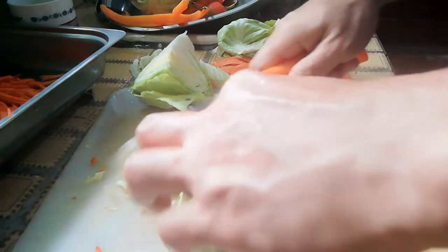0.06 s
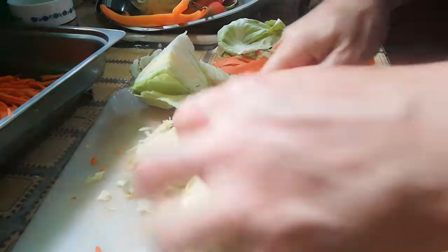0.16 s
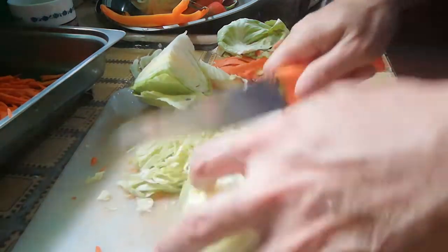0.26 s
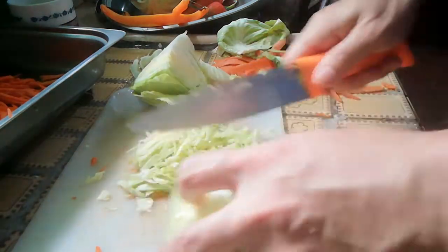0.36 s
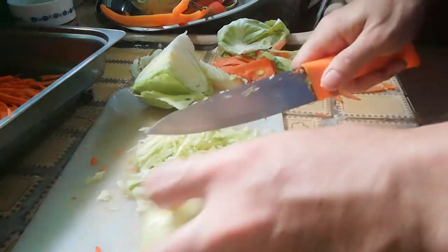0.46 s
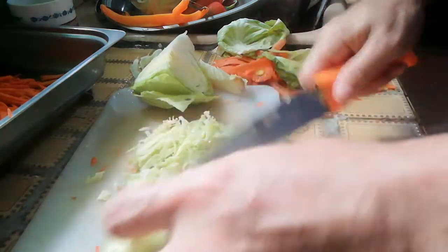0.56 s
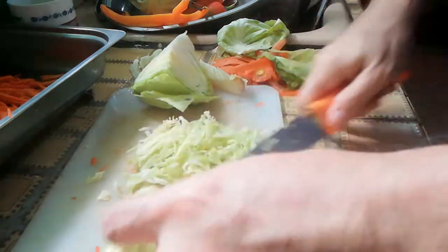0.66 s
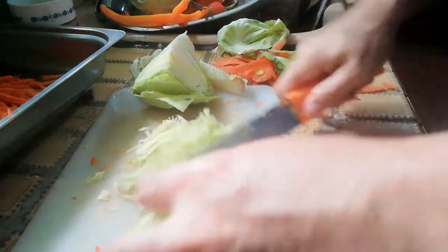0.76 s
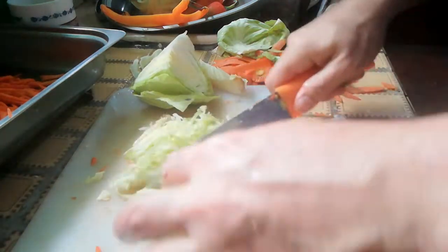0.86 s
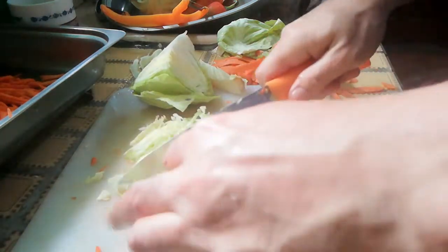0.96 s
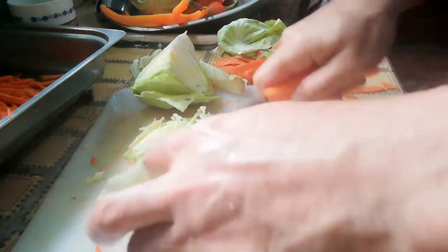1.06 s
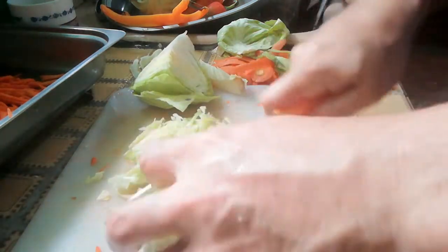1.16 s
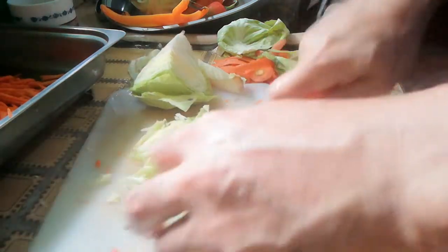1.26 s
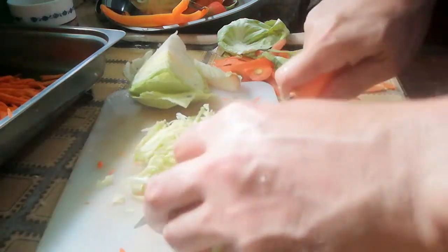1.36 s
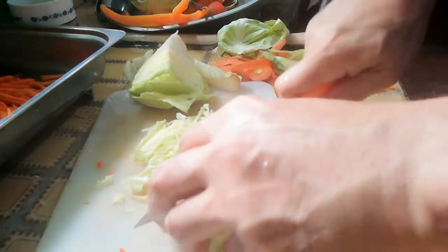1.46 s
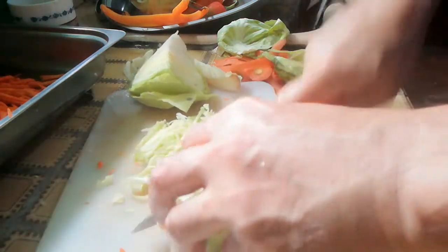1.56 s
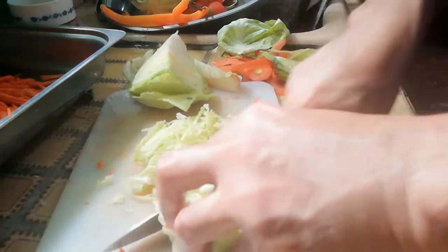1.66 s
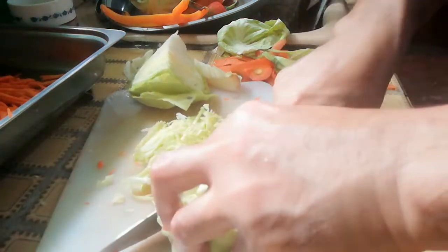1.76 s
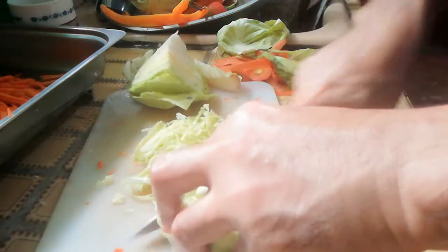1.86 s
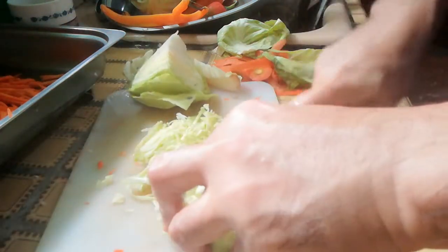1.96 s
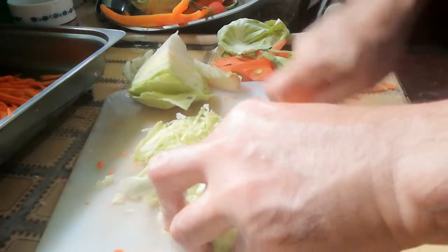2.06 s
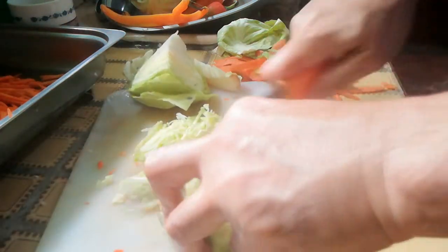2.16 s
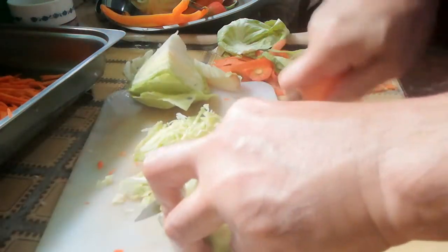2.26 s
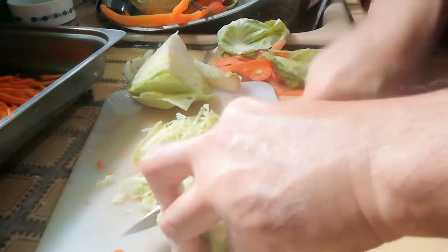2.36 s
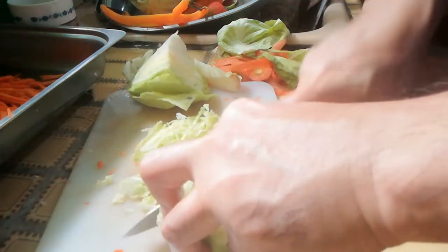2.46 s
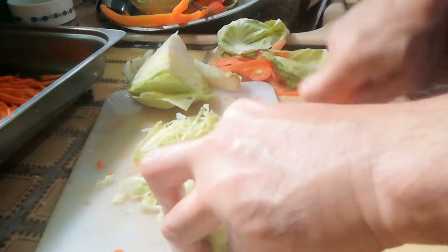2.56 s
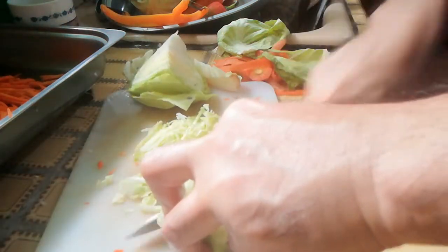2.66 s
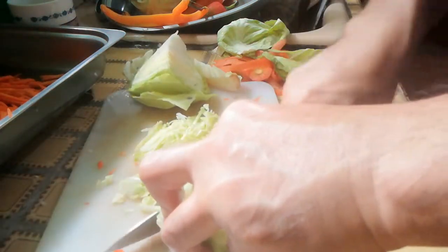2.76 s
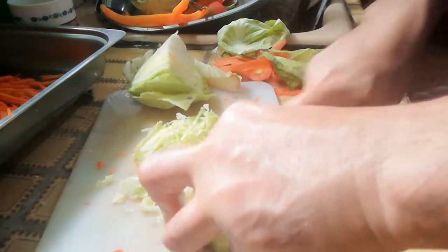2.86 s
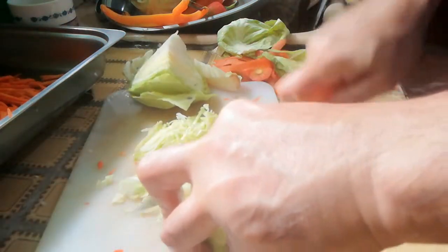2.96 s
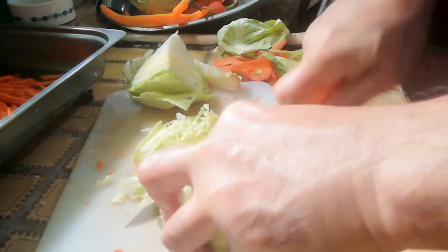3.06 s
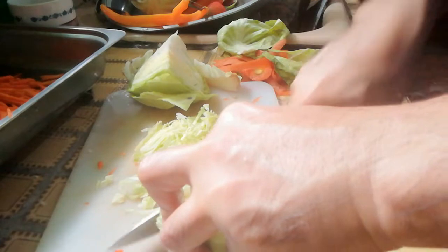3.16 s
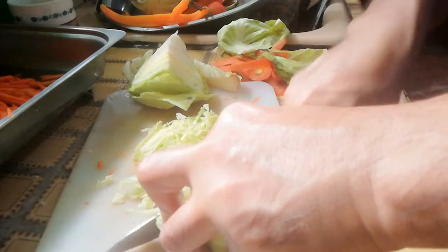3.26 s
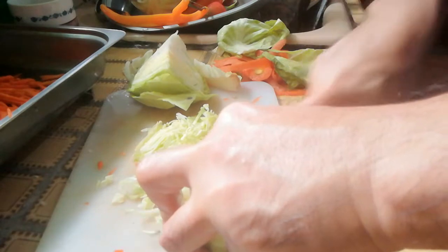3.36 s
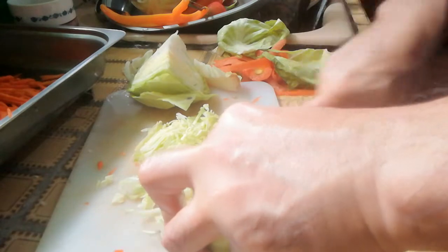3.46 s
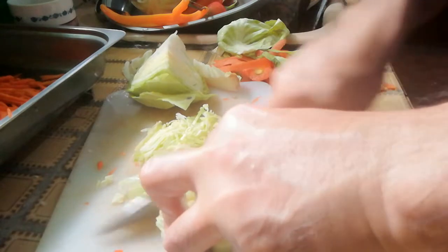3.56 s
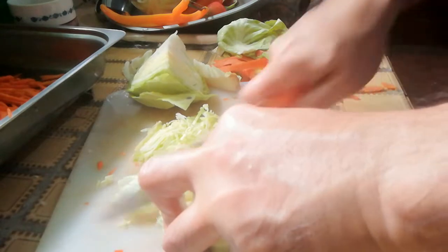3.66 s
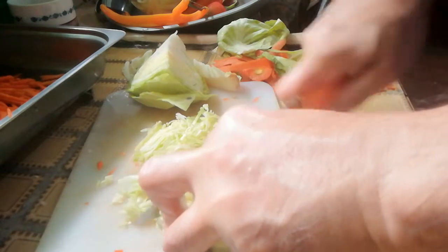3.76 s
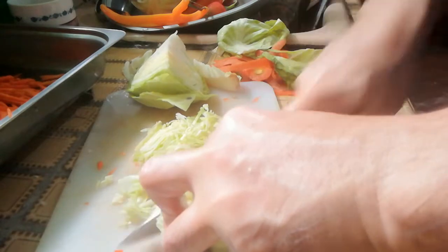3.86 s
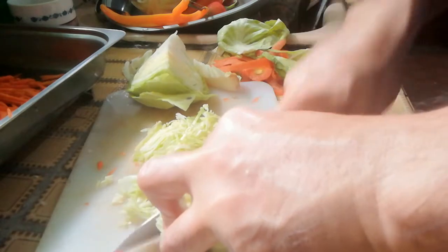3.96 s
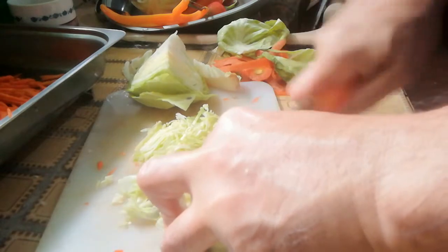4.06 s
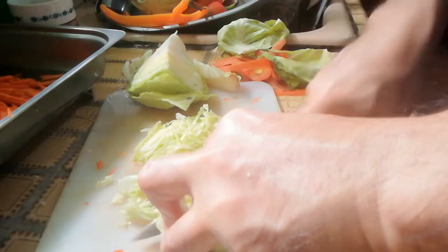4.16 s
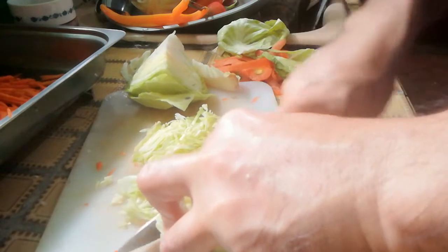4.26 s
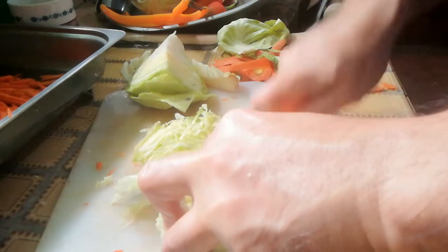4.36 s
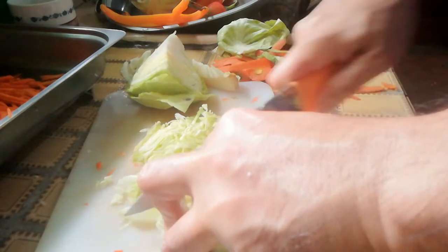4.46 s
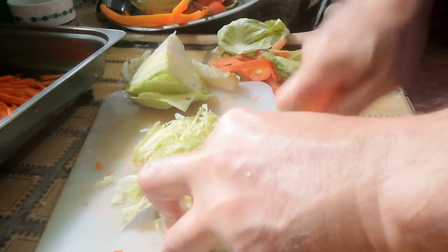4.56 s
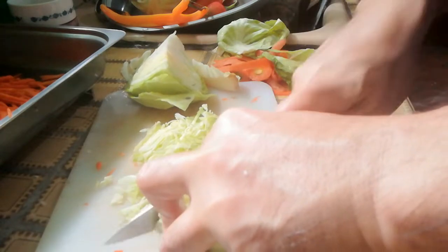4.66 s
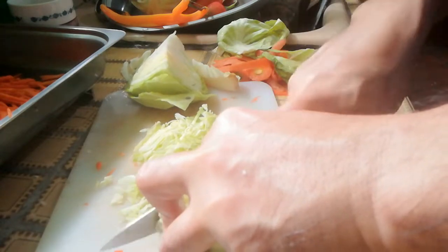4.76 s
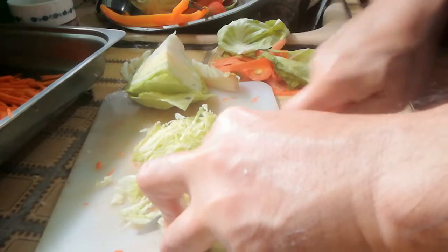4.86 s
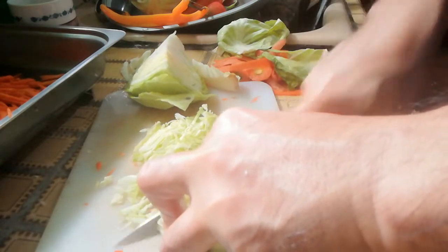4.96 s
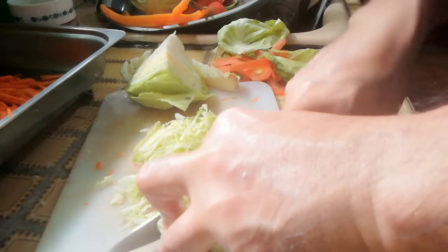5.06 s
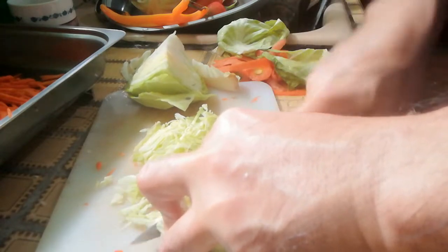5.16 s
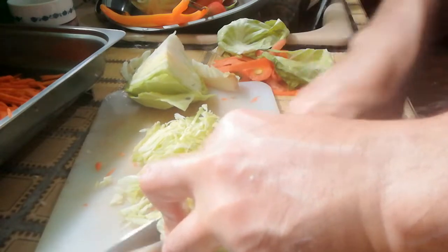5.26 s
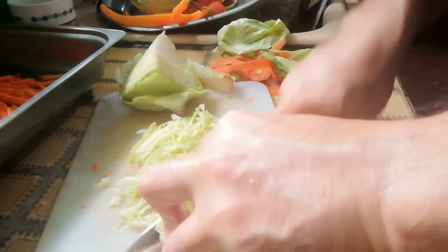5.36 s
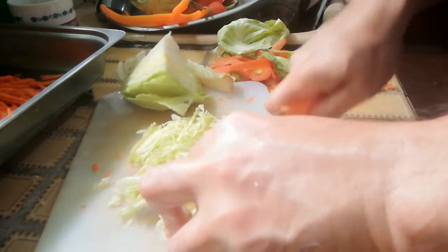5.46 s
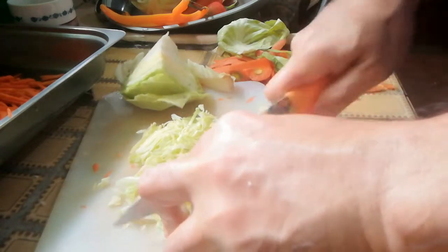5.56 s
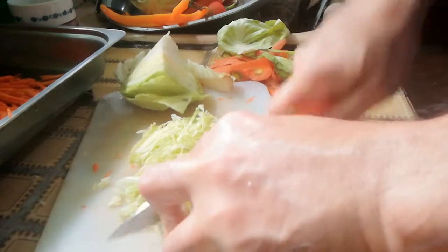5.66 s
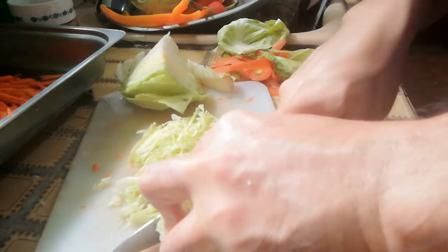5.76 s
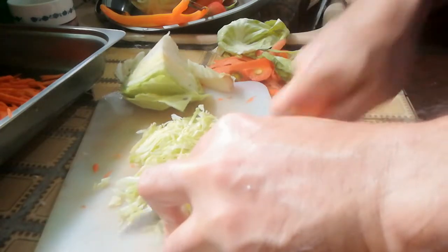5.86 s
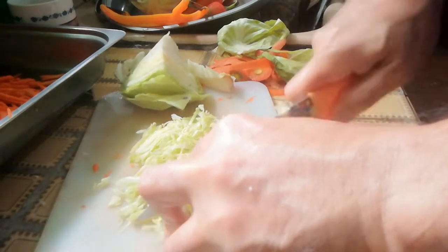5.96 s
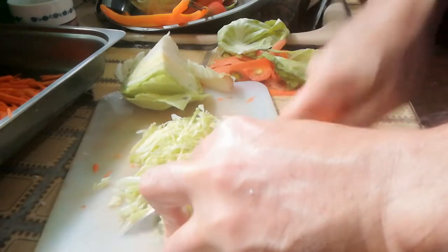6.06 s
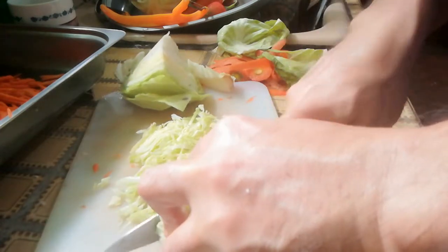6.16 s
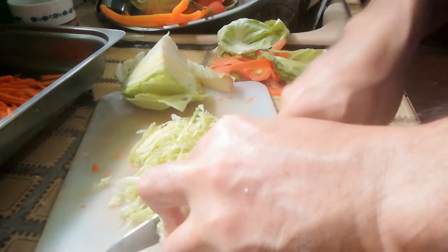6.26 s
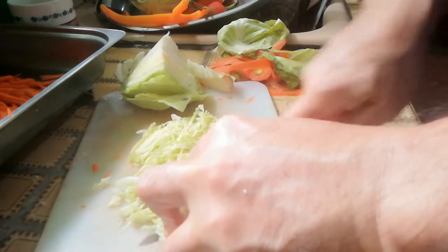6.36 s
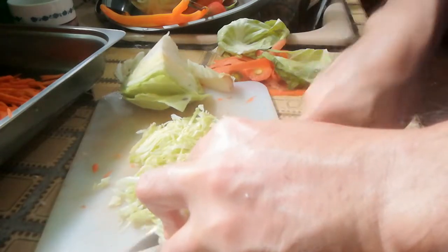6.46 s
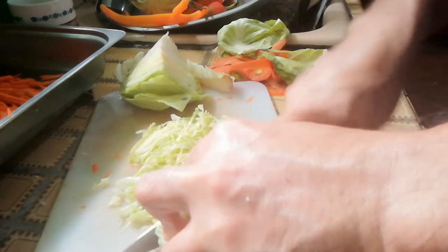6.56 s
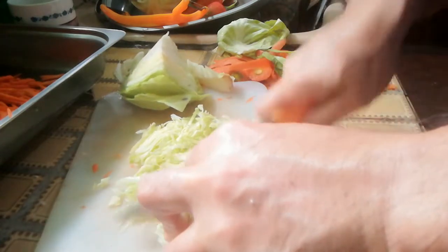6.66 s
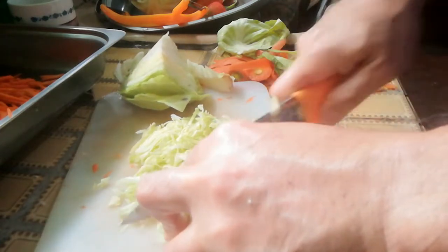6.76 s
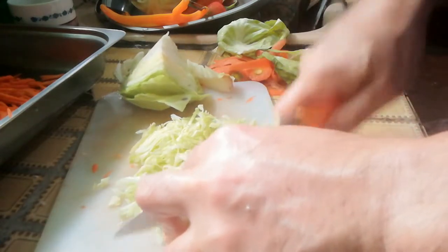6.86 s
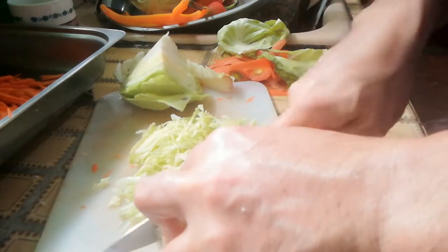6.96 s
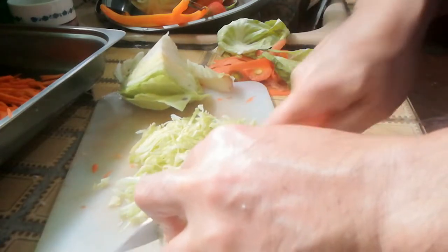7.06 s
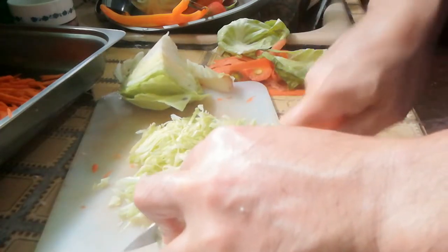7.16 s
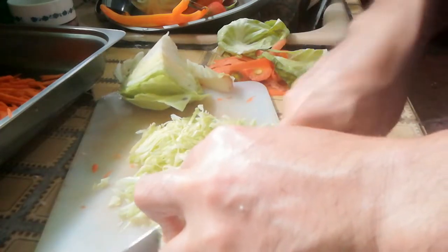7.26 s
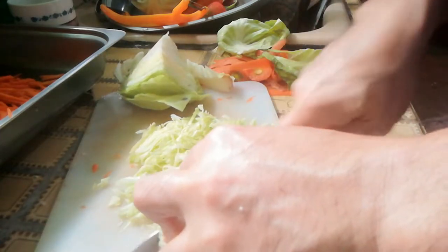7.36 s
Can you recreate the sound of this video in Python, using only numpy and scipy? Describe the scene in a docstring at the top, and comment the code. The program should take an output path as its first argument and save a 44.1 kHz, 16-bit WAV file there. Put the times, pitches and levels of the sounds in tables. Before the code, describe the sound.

Cabbage being shredded by hand, heard very near, with a short room reflection. Light leaf rustling and bright snaps come first, then a steady but uneven run of crunching cuts, from airy crackle to deeper crush. The blade edge scrapes and occasionally taps the board, the strongest tap late on, and a few heavy strokes thud dully into the table. Quiet mains hum and room air continue throughout.

```python
"""Over a mains hum and the soft rush of a small kitchen, a hand gathers cabbage leaves, rustling and snapping ribs.
Then a knife shreds the wedge close by: each cut grazes, bites deeper and leaves shreds to settle.
The crunch is layered from runs of bursting cells: crisp crackle, fine fizz and a deep crush.
From the first cut on, the edge rasps and ticks on the plastic board, and some strokes thud into the table.
Once, a faint low tone sags as the knife is drawn back."""
import sys
import numpy as np
from scipy import signal
from scipy.fft import rfft, irfft, next_fast_len
from scipy.io import wavfile
from scipy.ndimage import map_coordinates

SR = 44100
rng = np.random.default_rng(int(sys.argv[2]) if len(sys.argv) > 2 else 0)


def unload_wav(signal):
    """Save mono or channel-first audio to the path in sys.argv[1] as 16-bit WAV at rate SR, clipped to [-1, 1]."""
    wavfile.write(
        sys.argv[1],
        SR,
        np.round(np.clip(np.atleast_2d(signal).T, -1, 1) * 32767).astype(np.int16),
    )


N = 326781

# Event levels are those of the dry sounds, before panning and room.
# Rush of the quiet kitchen, relative spectrum: (frequency [Hz], level [dB])
AIR_SPECTRUM = [(20, -14), (45, -17), (80, -11.5), (105, -11.5), (150, -14), (235, -13), (320, -20.5),
                (450, -18), (700, -18), (1100, -21), (1600, -27), (3500, -29), (7500, -32), (11000, -44),
                (16000, -49)]
# Mains hum partials: (frequency [Hz], rms level [dB])
HUM_PARTIALS = [(59.9, -76), (119.85, -67)]
# Likeness of diffuse sound at the two spaced ports: (frequency [Hz], left-right correlation [-1 to 1])
PORT_LIKENESS = [(100, 0.97), (170, 0.94), (270, 0.86), (450, -0.42), (700, -0.87), (950, 0.11),
                 (1250, 0.1), (2000, 0.29), (3300, -0.056), (8000, -0.085)]
# Fingers and the flat of the blade push the leaves about:
# (time [s], length [s], crisp level [dB], weight of crush over crisp [dB])
RUSTLES = [(.005, 0.2, -75.5, -3), (0.323, 0.075, -55.5, -6.5), (0.595, 0.11, -60.5, -4.5),
           (0.697, 0.16, -56.5, -6), (0.948, .13, -61.5, -5), (1.114, 0.18, -54.5, -3),
           (1.312, 0.11, -53.5, -5), (1.478, 0.072, -46.5, -4), (1.728, 0.18, -53.5, -2),
           (2.06, 0.023, -47, -14), (2.16, 0.11, -59.5, -11), (2.49, .035, -55, -4.5),
           (2.588, 0.021, -49.5, 4.5), (2.8, 0.048, -55, 0.5), (3.28, 0.1, -48.5, -3.5),
           (3.995, 0.015, -50.5, -2), (4.305, .015, -55.5, 7), (4.805, 0.016, -50.5, -7),
           (5.338, 0.016, -46, -11), (5.823, 0.079, -63.5, 9.5), (6.536, 0.069, -54.5, -1),
           (7.34, 0.054, -56.5, -12.5)]
# The knife goes through the wedge:
# (time [s], length [s], crisp level [dB], weight of crush over crisp [dB], graze beforehand [s])
CUTS = [(1.568, 0.073, -37, -1, 0.035), (2.027, 0.0077, -38, -2.5, 0), (2.326, 0.058, -39, -1.5, 0.053),
        (2.635, 0.021, -36.5, -7, 0.055), (3.105, 0.09, -36.5, -3.5, 0.054),
        (3.532, 0.026, -41, 6.5, 0.064), (3.815, 0.066, -37.5, -3, 0.052), (4.092, 0.021, -36, 0, 0.042),
        (4.325, 0.017, -39.5, 2.5, 0.049), (4.592, 0.15, -42, -5.5, 0.071), (4.951, 0.069, -40.5, -3, 0),
        (5.202, 0.025, -36.5, -1.5, 0.062), (5.41, 0.019, -38.5, 2, 0.086), (5.683, 0.083, -40, -4, 0.043),
        (6.07, 0.13, -39.5, -4.5, 0.043), (6.427, 0.041, -38.5, -2.5, 0.0064),
        (6.605, 0.019, -43.5, 3, 0.026), (6.87, 0.09, -39.5, -3, 0.044), (7.179, 0.084, -40, -5.5, 0.0081)]
# Leaf skin cracking, relative spectrum: (frequency [Hz], level [dB])
CRISP_SPECTRUM = [(1500, -32), (3200, -9.5), (4300, -4.5), (5600, -4.5), (7400, 1.5), (8600, -4.5),
                  (10000, -14.5), (12500, -91), (16000, -25)]
# The finest fizz of the skin, relative spectrum: (frequency [Hz], level [dB])
FIZZ_SPECTRUM = [(7000, -1), (10000, 5), (12000, 1), (15800, -4)]
# Packed leaves being crushed, relative spectrum: (frequency [Hz], level [dB])
CRUSH_SPECTRUM = [(60, -54), (160, -18.5), (330, -21), (600, -16.5), (780, -12.5), (1080, -3.5),
                  (1800, -4.5), (2500, -6), (3300, -1.5), (4500, -3.5), (7000, -9), (12000, -32.5)]
# Single ribs and shreds snap: (time [s], peak level before a 3 dB lift [dB], pitch [Hz])
RIB_SNAPS = [(0.603, -32.5, 4440), (0.7592, -39.5, 6740), (1.112, -35, 7400), (1.3217, -34.5, 7260),
             (1.3968, -30.5, 7780), (1.482, -32, 7500), (1.4892, -30, 3300), (1.702, -29.5, 9100),
             (1.7947, -30.5, 6230), (1.8703, -33, 7500), (2.1907, -35, 7500), (2.3101, -27, 4400),
             (3.0224, -43, 7940), (3.0725, -31.5, 7600), (3.0904, -29, 7500), (3.1945, -26, 9000),
             (3.7025, -35, 8600), (4.0846, -29.5, 7600), (4.243, -35, 7550), (4.4842, -30.5, 6900),
             (4.528, -39.5, 7950), (4.57, -32, 7680), (4.6051, -26, 7700), (5.3427, -28, 7250),
             (6.009, -40, 4550), (6.2246, -28.5, 7740), (6.7642, -41.5, 4500), (7.2541, -24, 8140)]
# The edge bites and skids over the board: (time [s], length [s], level [dB], pitch [Hz])
BOARD_SCRAPES = [(1.588, 0.048, -44, 1060), (2.013, 0.026, -42, 2160), (2.635, 0.037, -40.5, 1450),
                 (3.181, 0.026, -41, 1190), (3.529, 0.026, -34.5, 2830), (4.09, 0.019, -49, 4240),
                 (4.311, 0.034, -39, 3250), (5.203, 0.035, -51, 7570), (5.41, 0.022, -32, 3100),
                 (6.139, 0.05, -45, 1350), (6.418, 0.016, -41.5, 6800), (6.614, 0.025, -37, 2470),
                 (7.112, 0.027, -54, 1410)]
# The table under a heavy stroke: (time [s], starting level [dB], pitch [Hz])
TABLE_THUDS = [(1.614, -55, 189), (2.331, -54, 200), (4.099, -50.5, 192), (5.754, -53, 45.5)]
# The edge breaks through and lands: (time [s], level [dB], hardness [dB], ring [Hz])
BOARD_TAPS = [(1.636, -32.5, -4, 1500), (2.6545, -30, -8, 1700), (4.1065, -25, -14, 1780),
              (5.2222, -28.5, -10, 1820), (5.7655, -20.5, -1, 1920), (6.4698, -31, -10, 1860),
              (7.257, -33, 2, 1550)]
# Modes of blade on board before choking: (multiple of the ring [ratio], level [dB], t60 [s])
BOARD_MODES = [(.64, 1, .012), (1, 13.5, .018), (1.24, 12.5, .008), (1.6, 11.5, 0.015), (2.45, -4, .006),
               (4.05, 13, .008)]
# Decay of the room: (frequency [Hz], t60 [s])
KITCHEN_DECAY = [(300, 0.57), (1000, 0.34), (2700, 0.33), (4500, 0.25), (8000, 0.28), (14000, 0.29)]

HOLD_DB = -77  # the wedge creaks faintly under the hand that holds it
RUSTLE_RISE_S, RUSTLE_FALL_S = 0.011, 0.02
# A cut builds up as the edge sinks in (a longer one more gently) and stops once it is through
BITE_S, BITE_SHARE, THROUGH_S = 0.0068, 0.093, 0.0071
DEEPEN_DB = 2.5  # gain in weight over one cut, from crisp outer leaves to packed core
# The graze before a cut and the shreds settling after it: level and weight against the cut
GRAZE_DB, GRAZE_WEIGHT_DB = -14.5, -7
SETTLE_DB, SETTLE_WEIGHT_DB = -10, -1.5
SETTLE_S, SETTLE_SHARE = 0.029, .55  # a longer cut leaves more shreds, which settle longer
# Small shreds snapping in a rustle: rate, peak over the rustle before the snaps' lift, centre pitch
STRAYS_PER_S, STRAY_DB, STRAY_HZ = 14, 14, 7340
TOP_HZ = 15850  # band limit of the recorder


def amp(db):
    """Decibels to gain."""
    return 10 ** (np.asarray(db) / 20)


def unit(x):
    """Scale to rms 1."""
    return x / np.sqrt(np.mean(x ** 2) + 1e-20)


def along(points, hz):
    """Read (frequency, value) points on a log frequency axis."""
    f, v = np.transpose(points)
    return np.interp(np.log(hz + 1), np.log(f + 1), v)


def clock(count):
    """Seconds of count samples."""
    return np.arange(count) / SR


def filtered(x, response):
    """Apply a response of frequency to x, padded so that its tail does not wrap at once."""
    n = x.shape[-1]
    m = next_fast_len(n + min(n, SR // 4))
    hz = np.fft.rfftfreq(m, 1 / SR)
    return irfft(rfft(x, m) * response(hz), m)[..., :n]


def coloured(x, spectrum):
    """Shape x by (frequency, dB) points."""
    return filtered(x, lambda hz: amp(along(spectrum, hz)))


def resonance(hz, centre, q):
    """Response of one damped mode."""
    damping = 1j * hz * centre / q
    return damping / (centre ** 2 - hz ** 2 + damping)


def add(track, s, sound):
    """Mix a stereo sound in at time s."""
    part = track[:, max(round(s * SR), 0):][:, :sound.shape[1]]
    part += sound[:, :part.shape[1]]


def panned(x, left_db):
    """Make the left side louder than the right by left_db."""
    return x * amp(np.array([[left_db], [-left_db]]) / 2)


def swell(s, length, rise, fall):
    """Attack, hold and release: a gain that grows up to s, holds for length and dies away."""
    t = clock(N) - s
    attack = np.minimum(t, 0) / rise
    release = np.maximum(t - length, 0) / fall
    return np.exp(attack - release)


def wobble(rate):
    """A random curve: straight lines between rate knots a second."""
    knots = rng.standard_normal(int(N * rate / SR) + 4)
    return map_coordinates(knots, [clock(N) * rate], order=1)


def ports(pair):
    """Two unrelated noises become a diffuse field: alike in the bass, opposed where half a wave spans the ports."""
    def mix(hz):
        turn = np.arccos(np.clip(along(PORT_LIKENESS, hz), -1, 1)) / 2
        return np.array([np.cos(turn), np.sin(turn)])

    mid, side = filtered(pair, mix)
    return np.array([mid + side, mid - side])


def paths(scatter, t60):
    """From one spot on the board to both ports: straight, right first, then scattered by hand, blade and table."""
    t = clock(count=600)
    bounces = ports(rng.standard_normal((2, len(t)))) * amp(-60 * t / t60) * (t > 4 / SR)
    response = scatter * bounces / np.linalg.norm(bounces, axis=1, keepdims=True)
    response[[0, 1], [4, 0]] += 1  # direct sound: left 4 samples after right
    return response


def background():
    """Mains hum as steady sines over the soft rush of the room, a coloured diffuse noise."""
    rush = unit(coloured(ports(rng.standard_normal((2, N))), AIR_SPECTRUM))
    hum = np.zeros(N)
    for hz, db in HUM_PARTIALS:
        hum += amp(db) * np.sqrt(2) * np.sin(2 * np.pi * (hz * clock(N) + rng.random()))
    return amp(-64.0) * rush + hum


def knife_work():
    """Level and weight (dB) of the crunch: every cut grazes, bites and leaves shreds; rustles join in."""
    parts = [(swell(s, length, RUSTLE_RISE_S, RUSTLE_FALL_S), db, weight)
             for s, length, db, weight in RUSTLES]
    for s, length, db, weight, graze in CUTS:
        depth = np.clip((clock(N) - s) / length, 0, 1) - .5
        grazing = swell(s - graze, graze, BITE_S, THROUGH_S)
        biting = swell(s, length, BITE_S + BITE_SHARE * length, THROUGH_S)
        settling = swell(s + length, 0, BITE_S, SETTLE_S + SETTLE_SHARE * length)
        parts += [(grazing, db + GRAZE_DB, weight + GRAZE_WEIGHT_DB),
                  (biting, db, weight + DEEPEN_DB * depth),
                  (settling, db + SETTLE_DB, weight + SETTLE_WEIGHT_DB)]
    # the parts add as powers
    hold = amp(HOLD_DB) ** 2
    crisp = hold + sum((gain * amp(db)) ** 2 for gain, db, weight in parts)
    crush = hold + sum((gain * amp(db + weight)) ** 2 for gain, db, weight in parts)
    return 10 * np.log10(crisp), 10 * np.log10(crush / crisp)


def crackle(spectrum, fibre_hz, spread_db, count):
    """Leaf after leaf gives way, count a second: a first crack, then a dying run of bursting cells; rms 1."""
    out, t = np.zeros((2, N)), clock(count=900)
    for turn in range(N * count // SR):
        bursts = rng.random(len(t)) < 1700 / SR  # about 1700 a second
        cells = rng.uniform(-1, 1, len(t)) * bursts * amp(-60 * t / .06)
        cells[0] = 1
        tear = signal.fftconvolve(cells[None], paths(scatter=1.8, t60=.007), axes=1)
        # thick and thin fibres each ring at their own pitch
        pitch_hz = fibre_hz * 2 ** rng.uniform(-.8, .8)
        tear = filtered(tear, lambda hz: .5 + resonance(hz, pitch_hz, q=5))
        tear = unit(tear) * amp(spread_db * rng.uniform(-1, 1))
        add(out, (turn + rng.random()) / count, tear)
    return unit(coloured(out, spectrum))


def cabbage():
    """Light slicing fizzes; leaning on the knife crushes the packed leaves and sounds deeper."""
    level_db, weight_db = knife_work()
    crisp = crackle(CRISP_SPECTRUM, fibre_hz=6020, spread_db=3.5, count=220)
    crisp = crisp * amp(level_db)
    fizz = crackle(FIZZ_SPECTRUM, fibre_hz=11100, spread_db=1.0, count=260)
    fizz = fizz * amp(level_db - 15 - 0.11 * weight_db)
    crush = crackle(CRUSH_SPECTRUM, fibre_hz=2002, spread_db=1.5, count=230)
    crush = crush * amp(level_db + weight_db + 1.0)
    return panned(crisp, left_db=4.0) + panned(fizz, left_db=1.5) + panned(crush, left_db=-0.1)


def strays():
    """Rows like RIB_SNAPS for the small shreds that break at random while leaves are pushed about."""
    rows = []
    for s, length, db, weight in RUSTLES:
        for when, size, pitch in rng.random((round(STRAYS_PER_S * length), 3)):
            peak_db = db + STRAY_DB + 3 * (size - .5)
            rows.append((s + when * length, peak_db, STRAY_HZ * 2 ** (.3 * (pitch - .5))))
    return rows


def snaps():
    """A rib gives way with one sharp crack and a short run of smaller ones that ring at its own pitch."""
    out, t = np.zeros((2, N)), clock(count=1500)
    for s, db, pitch_hz in [*RIB_SNAPS, *strays()]:
        bursts = rng.random(len(t)) < 3000 / SR  # about 3000 a second
        run = rng.uniform(-1, 1, len(t)) * bursts * amp(-60 * t / .02)
        run[0] = 1
        cracks = signal.fftconvolve(run[None], paths(scatter=2, t60=.008), axes=1)
        snap = filtered(cracks, lambda hz: resonance(hz, pitch_hz, q=5) + .4)
        snap = coloured(snap, [(300, -49), (1300, -5.0), (8200, -3.5), (11000, -17.5), (16000, -28)])
        add(out, s, amp(db + 3) * snap / np.abs(snap).max())
    return panned(out, left_db=3.0)


def scrapes():
    """The edge catches suddenly, then sticks and slips on the plastic: a short rasp around one resonance."""
    out, t = np.zeros((2, N)), clock(count=7000)
    for s, length, db, pitch_hz in BOARD_SCRAPES:
        slips = rng.standard_normal(len(t)) * (rng.random(len(t)) < 3000 / SR)
        rasp = signal.fftconvolve(slips[None], paths(scatter=5.7, t60=0.0029), axes=1)[:, :len(t)]
        rasp = unit(filtered(rasp, lambda hz: resonance(hz, pitch_hz, q=1.58) ** 2))
        envelope = np.minimum(t / .003, 1) * np.exp(-(t / length) ** 4)
        add(out, s, amp(db) * rasp * envelope)
    return panned(out, left_db=4.0)


def table(t60=0.26):
    """Heavy strokes thud through the board into the table: decaying noise through a broad resonance."""
    out, t = np.zeros((2, N)), clock(count=9000)
    for s, db, pitch_hz in TABLE_THUDS:
        noise = rng.standard_normal(len(t))
        thud = unit(filtered(noise, lambda hz: resonance(hz, pitch_hz, q=0.95) ** 2))
        envelope = amp(db - 60 * t / t60) * np.minimum(t / 0.0062, 1)
        add(out, s, envelope * thud[None])
    return out


def taps(choke_s=0.003, contact_s=0.0028):
    """The edge hits the board with a woody tick, choked as it presses in; a harder landing wakes the upper modes."""
    out, t = np.zeros((2, N)), clock(count=2000)
    band = signal.butter(2, [1350, 9000], "bandpass", fs=SR, output="sos")
    for s, db, hard_db, ring_hz in BOARD_TAPS:
        ring = np.zeros(len(t))
        for multiple, level_db, t60 in BOARD_MODES:
            # hardness phases in over the first octave above the ring
            mode_db = level_db + hard_db * np.clip(np.log2(multiple), 0, 1)
            ring += amp(mode_db - 60 * t / t60) * np.cos(2 * np.pi * multiple * ring_hz * t)
        ring = signal.sosfilt(band, ring * np.exp(-(t / choke_s) ** 2))
        tap = signal.fftconvolve(ring[None], paths(scatter=.35, t60=.008), axes=1)
        # the level is the left side's rms if its energy filled the contact time
        add(out, s, amp(db) * tap * np.sqrt(contact_s * SR) / np.linalg.norm(tap[0]))
    return panned(out, left_db=3.0)


def low_tone(peak_s=2.265, length_s=0.078, peak_hz=246, fall_hz_per_s=170, db=-60):
    """A faint, unsteady low tone sags briefly while the knife is drawn back: a falling sine in a soft swell."""
    t = clock(N) - peak_s
    gain = amp(db + 3.5 * wobble(rate=50)) * np.exp(-(t / length_s) ** 2)
    return gain * np.sin(2 * np.pi * (peak_hz * t - fall_hz_per_s * t ** 2 / 2))


def kitchen(x):
    """The walls answer with a diffuse tail that builds over 1.6 ms, each frequency dying at its own speed."""
    noise = ports(rng.standard_normal((2, SR // 2)))
    hz, t, z = signal.stft(noise, SR, nperseg=256)
    decay = amp(-60 * t / along(KITCHEN_DECAY, hz)[:, None])
    tail = signal.istft(z * decay, SR, nperseg=256)[1]
    tail = tail * np.clip(clock(tail.shape[1]) / 0.0016, 0, 1)
    return signal.fftconvolve(x, tail / np.linalg.norm(tail[0]), axes=1)[:, :N]


def scene():
    """Knife work in the room, over the hum."""
    leaves = cabbage() + snaps() + scrapes()
    knocks = taps()
    room = kitchen(amp(-6) * leaves + amp(-7.0) * knocks)
    return leaves + knocks + room + table() + low_tone() + background()


def record(dry):
    """The recorder keeps nothing above its band limit."""
    return filtered(dry, lambda hz: hz < TOP_HZ)


dry = scene()
out = record(dry)
unload_wav(out)
```